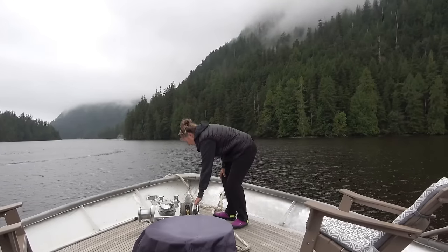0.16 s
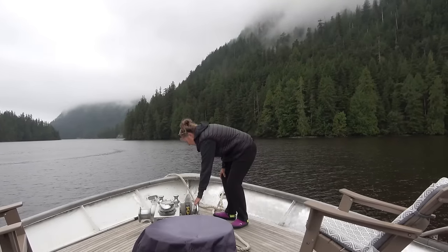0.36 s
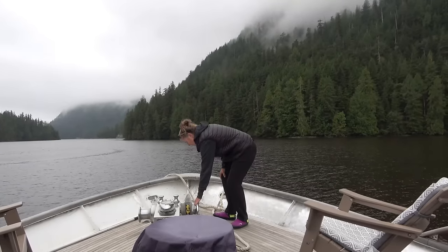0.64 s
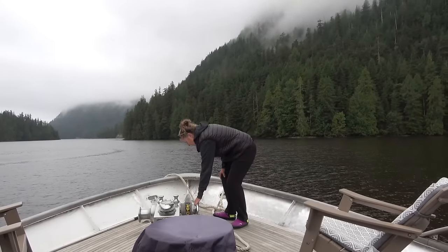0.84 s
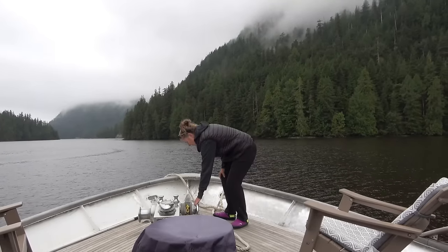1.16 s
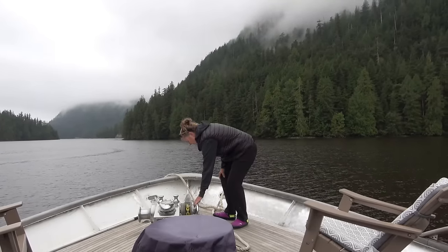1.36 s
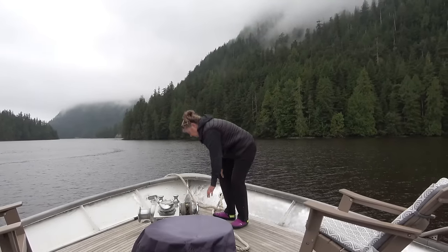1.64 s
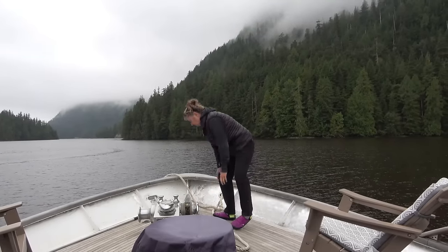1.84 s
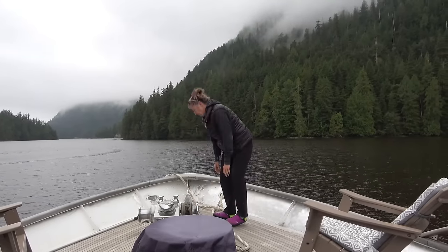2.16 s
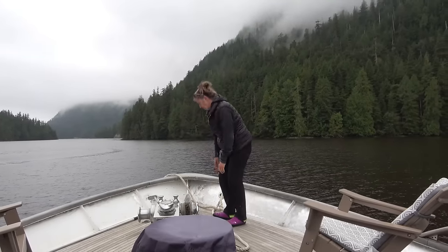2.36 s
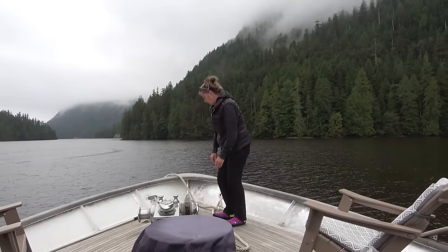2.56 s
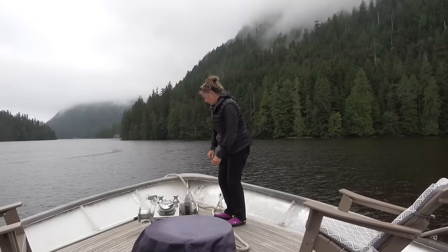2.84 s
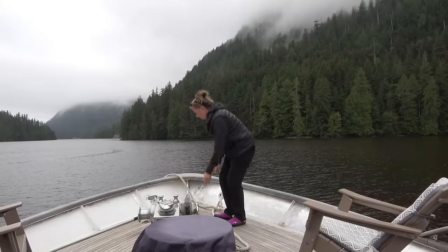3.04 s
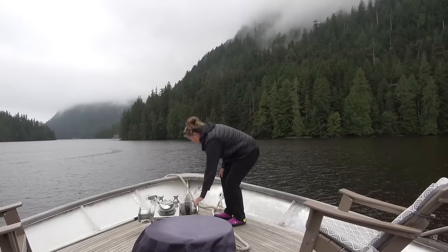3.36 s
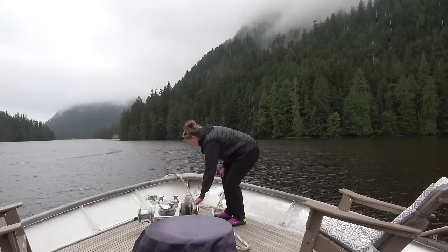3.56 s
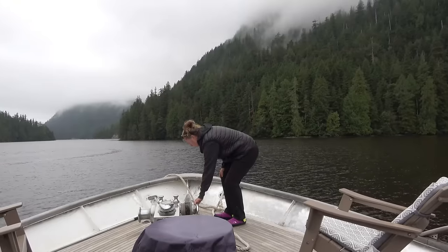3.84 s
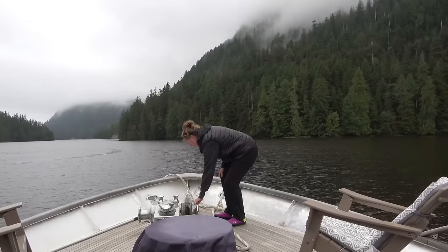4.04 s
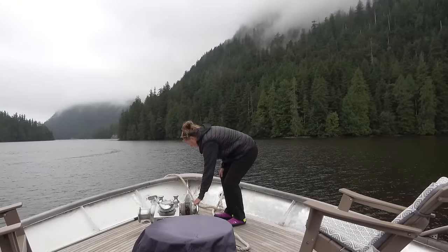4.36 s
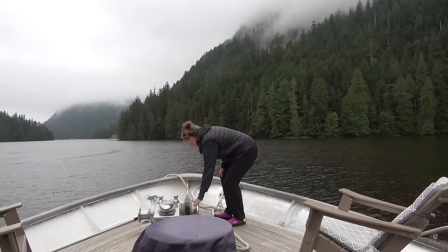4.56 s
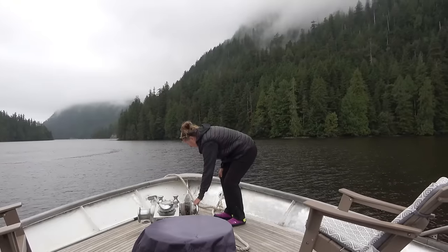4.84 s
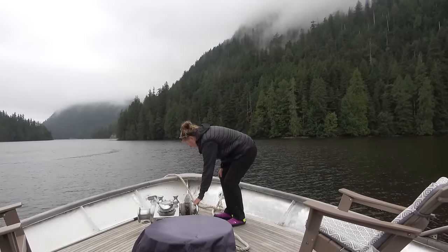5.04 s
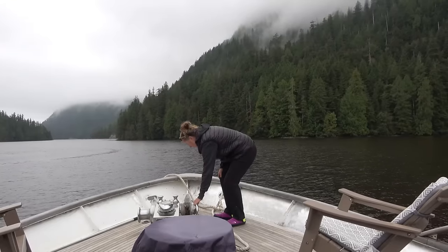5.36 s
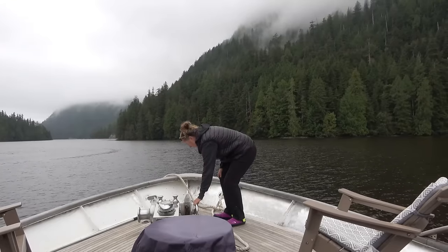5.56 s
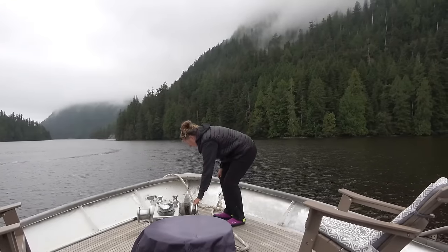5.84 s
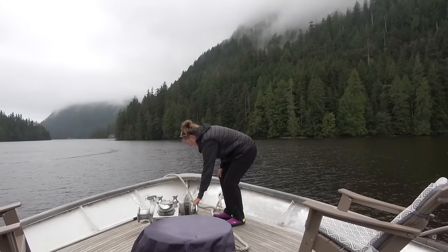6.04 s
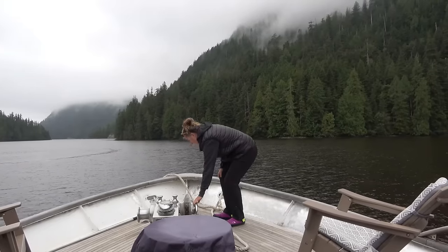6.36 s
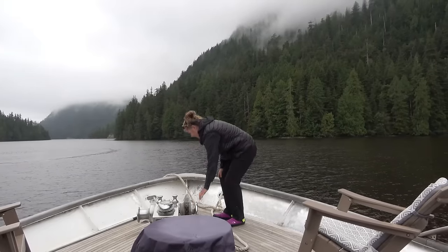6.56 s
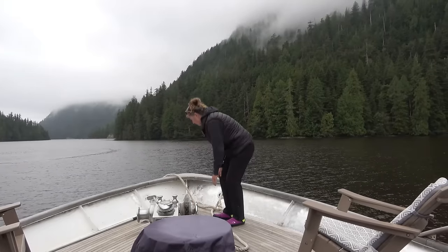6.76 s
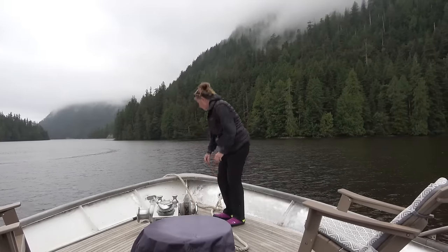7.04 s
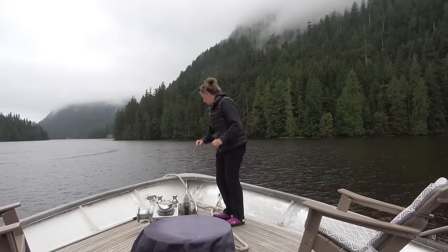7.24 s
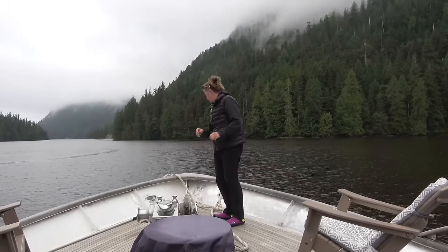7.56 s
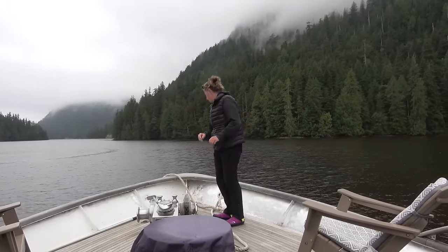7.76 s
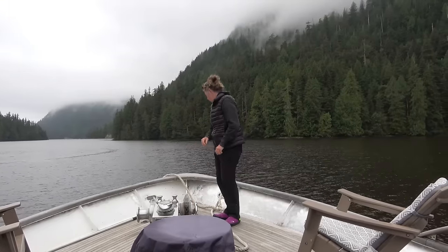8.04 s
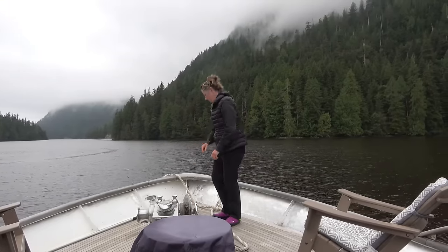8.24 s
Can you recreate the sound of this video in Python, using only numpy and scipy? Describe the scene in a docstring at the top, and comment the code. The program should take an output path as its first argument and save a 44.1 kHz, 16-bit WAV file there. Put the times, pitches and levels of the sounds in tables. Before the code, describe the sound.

Outdoors on a boat's foredeck, low diesels throb steadily throughout, their hum beating about five times a second, with a faint pump and soft wash of exhaust, water and air. From 0 to 0.7 s, anchor chain clanks loosely over windlass and roller, hardest near 0.4, then nearly stops. Around 1.1 s it starts again, with uneven steel blows, a deep swell near 1.75, and bright bell-like clinks from 2 s. By 2.7-3.9 s it is a dense, loud rattle drumming on the hollow deck, cut off near 4 s with small dying knocks. From 4.8 to 6 s a sparser third burst gives separate hard clanks and a few ringing clinks, then faint ticks until 6.7. Engines remain alone; a very faint jacket swish comes at 7.75, a deep swell at 8.1, and a dull gust rises on the microphone at the end. Close, dry, centred.

```python
"""In a calm bay, on the foredeck of an idling boat, an anchor chain runs out over the bow in three bursts.
Links clank on windlass and bow roller: bursts of noise ring through coloured bodies, with short sine notes.
Loose links clink with bell-like modes; the chain drags and rattles as streams of random knocks.
Behind lie the throbbing orders of two diesels, a pump, a wash of exhaust, water and air, two deep swells,
one jacket swish and a dull gust that gets up on the microphone near the end."""
import sys
import numpy as np
from scipy import signal
from scipy.fft import rfft, irfft, next_fast_len
from scipy.io import wavfile
from scipy.ndimage import uniform_filter1d

SR = 44100
rng = np.random.default_rng(int(sys.argv[2]) if len(sys.argv) > 2 else 0)


def log_audio(samples):
    """Write samples as a 16-bit WAV file to the path given in sys.argv[1]."""
    # one column per channel
    frames = np.atleast_2d(samples).T
    # limit to full scale, then quantise
    limited = np.clip(frames, -1, 1)
    pcm = np.round(limited * 32767).astype(np.int16)
    wavfile.write(sys.argv[1], SR, pcm)


N = 369999
TAPS = 8192  # length of a body's response and of one clank, in samples
T = np.arange(N) / SR
HZ = np.fft.rfftfreq(TAPS, 1 / SR)

# links striking windlass and bow roller: start_s, blow_db, then relative to the blow clang_db (high),
# edge_db (hard), boom_db (deck), song_db (windlass); pitch_hz of the link's own note
CLANKS = [(0.004, -41.5, -9, -50, -4, -12, 1490), (0.073, -36, -11, -46, -16, -13, 1250),
          (0.089, -40.5, -16, -44, -9, -4, 1230), (0.155, -39, -17, -42, -4, -21, 2660),
          (0.169, -37.5, -5, -35, -7, -22, 1900), (0.267, -36, -6.5, -29, -11, -6, 2270),
          (0.304, -36.5, -5.5, -23, -4, -6, 1846), (0.322, -35, -8.5, -38, -5.5, -15, 1860),
          (0.389, -21.5, -3, -24.5, -5, -8, 4250), (0.459, -52, -20, -17, 10, -5, 1350),
          (0.4895, -34, -4.5, -38, -7, -22, 2220), (0.535, -43.5, -7.5, -46, -4, -5, 2260),
          (0.575, -59, -20, -35, 7, -4, 1200), (0.61, -51, -19, -40, 1, 7, 1180),
          (0.689, -36, -6, -37, -8, -4, 1200), (0.838, -56, -15, -38, 4, 3, 1200),
          (0.871, -62.5, -20, -33, 16, -16, 1280), (1.044, -45, -8, -27, -18, -23, 2340),
          (1.123, -48.5, -3, -17, 5, 7, 3550), (1.229, -40, -3, -17, 8, 4, 2220),
          (1.247, -27, -4.5, -43, -13, -6.5, 2270), (1.278, -42, -12, -21, 0, -13, 2360),
          (1.293, -32.5, -10, -36, -6, -1.5, 2340), (1.32, -33, -6.5, -20.5, -11, -2, 1220),
          (1.341, -37.5, -9, -48, -13, 2, 2160), (1.358, -60, -14, -35, 2, 1, 1240),
          (1.398, -40.5, -3, -14, 7, 7, 2230), (1.426, -30.5, -1.5, -34, -9, -7, 2160),
          (1.493, -42, 4, -9, 9.5, 12, 2720), (1.543, -36.5, -7.5, -38, -6.5, 2.5, 1260),
          (1.579, -35, -3, -15.5, 0, 7, 4520), (1.629, -25.5, 1, -25.5, -3.5, -2, 1770),
          (1.665, -36, -6.5, -23.5, -15, -22, 2030), (1.69, -42, 1, -16.5, 1, -2, 2670),
          (1.723, -20.5, 0, -11.5, -7.5, -9, 2620), (1.739, -38.5, -1.5, -21.5, -13, -13, 2200),
          (1.75, -39.5, -5, -30, -6, -15, 1240), (1.777, -34, -4.5, -19, 1.5, 5, 1990),
          (1.811, -43, -4, -42, -8, -18, 1950), (1.838, -30.5, -11, -22, 1, -2, 4270),
          (1.857, -23, -2.5, -21, -3.5, -26, 4280), (2.003, -34, -14.5, -30.5, -8, 7, 1400),
          (2.018, -32, -9, -24, 1.5, -7, 1740), (2.034, -46.5, 5, -21, 9.5, 13.5, 2180),
          (2.086, -37, 0.5, -12.5, 0, 7.5, 2340), (2.147, -21, 0.5, -18.5, -5, -19, 2610),
          (2.167, -40, -14, -32.5, 6, -5, 1410), (2.206, -35, -2.5, -13, 4, 6, 2290),
          (2.239, -33.5, -8.5, -19, -1.5, -16, 2610), (2.259, -24.5, 3, -17.5, -7.5, -24, 2700),
          (2.283, -32.5, -21.5, -42, -6.5, -11, 1890), (2.31, -44.5, 8, -12.5, 0, 9, 3670),
          (2.349, -32.5, -10, -20, -8, -3, 4100), (2.3695, -21.5, 1, -11.5, -6, -9, 4100),
          (2.391, -31, -1.5, -23, 0, -16, 2000), (2.422, -47, 3, -3, 10, 6, 3700),
          (2.457, -45.5, 9, -21, 2.5, -12, 4090), (2.48, -28.5, 2.5, -10.5, -0.5, -1.5, 2280),
          (2.523, -29, -2, -20.5, -4, -14, 2260), (2.559, -48, 8, -36, -9, -20, 2680),
          (2.59, -45.5, 12.5, -5, -7.5, -18, 2700), (2.61, -35, -4, -10.5, -8.5, 4, 2190),
          (2.625, -33, -9, -32.5, 3, -6, 2750), (2.648, -36, 11.5, -8.5, -3, 11.5, 2730),
          (2.718, -22, 1.5, -6.5, -5, -6.5, 4060), (2.787, -42, 7.5, -4, -13, -6, 2700),
          (2.803, -35.5, 0, -14, 5.5, -3, 2260), (2.815, -29.5, 2, -8, 7.5, 7.5, 2580),
          (2.831, -36.5, -1.5, -29, -3, -10, 1780), (2.86, -32.5, -1.5, -14, -5, 2, 3560),
          (2.879, -29, -9.5, -46, 3, -15, 2360), (2.894, -32, 5, -27, -30.5, -14, 2800),
          (2.911, -23.5, 3, -14, -11, -13, 2670), (2.953, -31, 1, -11, 7, 7, 2540),
          (2.994, -36, -3, -12, -1.5, 8, 5180), (3.02, -26, 3, -9, -27, -21, 4230),
          (3.039, -31, -2, -15.5, 5.5, 2, 4550), (3.077, -29, -1.5, -18.5, -4, 2.5, 2310),
          (3.119, -38, 5.5, -6, 12.5, 11, 4490), (3.135, -24, -3.5, -19, -18, -19, 4320),
          (3.176, -28.5, -12, -44, -2, -9, 1820), (3.198, -32.5, -0.5, -18, -5.5, 5, 2240),
          (3.208, -24, -3, -18, -5.5, -5, 4520), (3.246, -34, -3.5, -16, 1.5, 6.5, 1360),
          (3.282, -25, -1, -19, -4.5, -3, 2610), (3.298, -32, -6, -26, -7.5, -12, 1400),
          (3.326, -25, -2.5, -22, -4, -1, 2700), (3.358, -28.5, -3, -17.5, 1.5, 4.5, 3660),
          (3.373, -29.5, 0.5, -14, -10, -19.5, 3600), (3.397, -26.5, -1.5, -19, 2.5, 4, 4290),
          (3.443, -28.5, 0, -20, -5, 4.5, 3800), (3.488, -23, -2, -18.5, -21, -8, 4240),
          (3.514, -24, -2.5, -23, -4, -5, 2690), (3.536, -34.5, -1.5, -14.5, -13.5, -14, 2250),
          (3.55, -29.5, 0, -15, 3, 8.5, 2670), (3.579, -28.5, -2.5, -12, 2.5, -25, 1940),
          (3.597, -25, -1, -22, -10.5, 1, 1880), (3.611, -37, -5.5, -18, 3.5, -3, 1220),
          (3.623, -25, -2.5, -18, -5, -8, 2800), (3.645, -40, 0, -25, -10, -5, 2020),
          (3.664, -32.5, 4, -12, -13, 8, 2750), (3.681, -34.5, 1, -20, -4, -6, 1380),
          (3.708, -31, 2, -12, 4.5, 8.5, 2680), (3.727, -28.5, -1.5, -19, -15, 4.5, 3700),
          (3.748, -26.5, 0.5, -14.5, -12, 1, 2600), (3.766, -28.5, -3.5, -22, 1, -12, 2660),
          (3.788, -36, -3, -29, 5, -1, 2900), (3.8, -38.5, 4, -22, -10, 7, 2240),
          (3.812, -33.5, 6.5, -12, -23, -5, 4540), (3.848, -36, 1.5, -22.5, 0, 1, 2570),
          (3.876, -34, -10, -29.5, -13, -5, 1650), (3.904, -31, -3.5, -24, -10, -7, 2000),
          (3.926, -27, 4, -25, -38, -19, 2760), (3.955, -27, -6, -32.5, -24, -8, 1180),
          (3.996, -43.5, -19, -38, -11, -2, 1200), (4.027, -43, -11, -45, -19, -13, 1415),
          (4.105, -54, -16, -40, -6, -10, 1380), (4.122, -53, -21, -38, -15, -4, 1200),
          (4.24, -60, -19, -39, -3.5, -2, 2080), (4.3, -59, -20, -38, -2, -1, 1410),
          (4.34, -62, -14.5, -38, -6, -6, 1610), (4.465, -48, -20, -44, -13, -14, 1670),
          (4.613, -47.5, -19, -38.5, -14, -12, 1150), (4.835, -44.5, -2, -27, 0.5, 5.5, 2530),
          (4.856, -32, -6, -37, -8, -20, 2630), (4.87, -53, -15, -38, 10, -12, 2680),
          (4.9495, -20.5, -2.5, -15, -12.5, -26, 1760), (4.966, -39, -9, -47, -6, -15, 1400),
          (4.988, -35, -6, -45, -13, -15.5, 1150), (5.018, -49, 0.5, -20, 13, 8, 2750),
          (5.0705, -22, -4, -20, -15.5, -28, 2710), (5.126, -36.5, -2, -22, -11, -3.5, 2610),
          (5.188, -27, 2, -14.5, -7.5, -17, 4090), (5.228, -36, -17, -43, -5, -5, 1140),
          (5.245, -47.5, 2, -19, 2, 0, 2630), (5.291, -28, -1.5, -26, -8, -7, 2310),
          (5.331, -33.5, -8, -33, -26, -15, 2560), (5.348, -37.5, -2, -35, -8, -11, 2650),
          (5.41, -24.5, -1.5, -21, -24, -36, 4670), (5.434, -37.5, -13, -42, -14, -20, 1200),
          (5.494, -32.5, -3.5, -34, -5, -6, 3610), (5.536, -51, -3, -30, -4, 2, 1400),
          (5.556, -40, -13, -38, -14, -8, 1820), (5.606, -28.5, -5, -29, -16, -15, 1840),
          (5.724, -45.5, -1.5, -20, 4, 3, 2600), (5.744, -36.5, -8, -36, 1, -16, 2660),
          (5.79, -48, -2, -23, 0, -5, 3640), (5.822, -26, -3.5, -29, -11, -9, 2715),
          (5.92, -38.5, -10, -24, 0, -3, 2220), (5.937, -30.5, -3, -31, -12, -17, 4430),
          (5.962, -47, -8, -34, -4, -20, 2010), (5.991, -31, -6, -29, -8.5, -15, 3670),
          (6.025, -35, -9.5, -45, -26, -14, 2610), (6.099, -61, -19, -40, 21, -1, 1240),
          (6.184, -45.5, -22, -42, -13, -15, 1146), (6.238, -62.5, -18, -38.5, 0, 5, 1410),
          (6.263, -60, -17, -36, 0, 3.5, 1200), (6.43, -62.5, -16.5, -35.5, 9, -6, 1150),
          (6.739, -61, -21, -31, 4.5, -7.5, 1220)]
# overall colour of roller and windlass: frequency_hz, relative level_db
STEEL = [(400, 16.5), (900, -6), (1600, -6.5), (3200, -11.5), (4500, -16), (5400, -21), (6300, -24.5),
         (7600, -32), (8800, -31), (11000, -43), (14000, -53), (15500, -40.5)]
# resonances of roller and windlass: frequency_hz, width_hz, lift_db
STEEL_MODES = [(804, 98, 7.3), (892, 110, 3.6), (1040, 120, 7.2), (950, 35, 3), (1135, 40, -2.5),
               (1220, 146, 7.6), (1383, 48, 7.7), (1469, 43, 5.7), (1600, 80, 3), (1715, 90, 6),
               (1883, 100, 6.6), (2015, 50, 3), (2198, 263, 7.1), (2287, 41, 3.6), (2389, 43, 2.7),
               (2685, 226, 8.3), (2876, 52, 4.2), (2980, 120, -3), (3240, 110, 4.5), (3624, 93, 5.0),
               (3832, 161, 2.4), (4138, 412, 7.3), (4312, 78, 5.0), (4532, 100, 8.8), (4930, 220, 3),
               (5235, 220, 8), (5490, 160, 4), (5910, 110, 3), (6650, 70, 4), (9600, 200, 3),
               (10850, 110, 4), (12100, 110, 6)]
# overall colour of the foredeck: frequency_hz, relative level_db
DECK = [(40, -22), (75, -9.5), (110, -0.5), (170, 1), (215, 0.5), (300, -4), (400, -3), (700, -15.5),
        (1100, -17.5), (1800, -27), (5000, -70.5)]
# resonances of the windlass on the deck: frequency_hz, width_hz, lift_db
DECK_MODES = [(239.6, 13, 9), (293.3, 7.7, 8), (480.4, 16, -4.5), (523, 30, 4.5), (567, 9.7, 7),
              (636.2, 47, 13), (679, 57, 8), (787, 48, 11), (830, 20, 11.5), (860, 24, 5.5), (1094, 34, 1)]
# colour of link ticking on link: frequency_hz, relative level_db
TICK = [(500, -7.5), (2500, 2.5), (5000, 11), (9000, 12), (13500, 0), (14900, 3.5), (15600, -2)]
# colour of the deepest rumble: frequency_hz, relative level_db
RUMBLE = [(10, -22.5), (20, -13.5), (27, 2), (36, -4.5), (55, -8), (90, -22.5), (200, -51.5), (600, -91)]
FULL_RUN_DB = -33.5  # drag of a free run


def amp(db):
    """Decibels to gain."""
    return 10 ** (np.asarray(db) / 20)


def unit(x):
    """Scales to rms 1."""
    return x / np.sqrt(np.mean(x ** 2) + 1e-20)


def curve(rows):
    """Joins (s, value) rows by straight lines."""
    return np.interp(T, *np.transpose(rows))


def add(mix, s, sound):
    """Mixes a sound in at time s."""
    start = round(s * SR)
    part, sound = mix[max(start, 0):], sound[max(-start, 0):]
    part[:len(sound)] += sound[:len(part)]


def colour(points, modes=()):
    """Gain over frequency: a smooth slope with resonances shaping it."""
    hz, db = np.transpose(points)
    slope = np.interp(np.log(HZ + 1), np.log(hz), db)
    peaks = sum(lift / (1 + (2 * (HZ - f) / width) ** 2) for f, width, lift in modes)
    return amp(slope + peaks)


def below(hz):
    """Gain of a smooth crossover low-pass."""
    return 1 / np.sqrt(1 + (HZ / hz) ** 8)


def ring(x, gain):
    """Passes x through a causal (minimum-phase) body of that gain, keeping the power of white noise."""
    cepstrum = irfft(np.log(np.maximum(gain / gain.max(), 1e-5)))
    # folding the cepstrum forward in time makes the response causal
    cepstrum[1:TAPS // 2] *= 2
    cepstrum[TAPS // 2 + 1:] = 0
    response = irfft(np.exp(rfft(cepstrum)))
    return signal.oaconvolve(x, response / np.linalg.norm(response))[:N]


def wander(rate_hz):
    """Random drift of rms 1: noise that fades out above about rate_hz."""
    size = next_fast_len(N, real=True)
    f = np.fft.rfftfreq(size, 1 / SR)
    spectrum = rfft(rng.standard_normal(size)) * np.exp(-(f / rate_hz) ** 2)
    return unit(irfft(spectrum, size)[:N])


def grit(spread_db):
    """Dense micro-impacts of uneven size."""
    return unit(rng.standard_normal(N) * amp(spread_db * wander(1400)))


def clanks(chatter_db=2):
    """Each link scrapes on, cracks on the steel and chatters briefly; deck, windlass and roller ring."""
    # how boom, song, blow, clang and edge swell and die: head_start_s, rise_s, decay_s,
    # late_tail_db, level_db, micro_impact_unevenness_db, crack_db
    registers = [(.002, 0.003, .011, -6, -0.5, 1.5, -7.5), (.002, 0.0032, .014, -17.5, -3, -0.5, -4.5),
                 (0.002, 0.0055, 0.012, -8.5, -3.14, .5, -6.5),
                 (0.00067, .0047, 0.0074, -20.5, 1.3, 2.5, -8.5), (0.0014, 0.0043, 0.007, -15, 7, 2, -5.5)]
    lead = .03  # s of each excerpt that lie ahead of the strike
    ripple_db = 2.2
    scrape_s, scrape_db = 0.0069, -15.5  # a link scrapes on before it seats itself
    tail_s = 0.023  # the roller rings on after
    # shares of the five registers, low to high, split the power at four crossovers
    crossovers = [below(hz) ** 4 for hz in (620, 800, 2900, 6500)]
    shares = np.sqrt(np.diff([0 * HZ] + crossovers + [1 + 0 * HZ], axis=0).clip(0))
    deck, steel = colour(DECK, DECK_MODES), colour(STEEL, STEEL_MODES)
    bodies = (deck, deck, steel, steel, steel)
    times, blow, clang, edge, boom, song, _ = np.transpose(CLANKS)
    levels = (blow + boom, blow + song, blow, blow + clang, blow + edge)
    spans = np.round((times[:, None] - lead) * SR).astype(int) + np.arange(TAPS)
    chatter, out = amp(chatter_db * wander(520)), np.zeros(N)
    # every link lands on another spot and favours other resonances
    spot = rng.standard_normal((len(CLANKS), len(HZ)))
    spot = uniform_filter1d(uniform_filter1d(spot, size=60), size=60)
    spot = amp(ripple_db * np.tanh(unit(spot)))
    for register, level, body, share in zip(registers, levels, bodies, shares):
        early_s, rise_s, decay_s, tail_db, trim_db, grit_db, crack_db = register
        t = np.arange(TAPS) / SR - lead + early_s
        before, after = np.maximum(-t, 0), np.maximum(t, 0)
        scrape = amp(scrape_db) * np.exp(-before / scrape_s)
        attack = np.hypot(np.exp(-(before / rise_s) ** 2), scrape)
        decay = np.hypot(np.exp(-after / decay_s), amp(tail_db) * np.exp(-after / tail_s))
        shape = attack * decay
        weight, gain = np.linalg.norm(shape), body * share
        # the crack is a single impulse at the strike
        crack = amp(crack_db) * weight * np.exp(-2j * np.pi * HZ * lead)
        noise = unit(chatter * grit(grit_db))[spans]
        force = spot * (crack + rfft(shape * noise))
        # every blow brings its body the same energy before its level is set
        force *= weight * np.linalg.norm(gain) / np.linalg.norm(force * gain, axis=1, keepdims=True)
        drive = np.zeros(N)
        for s, db, blow_force in zip(times, level, irfft(force)):
            add(drive, s - lead, amp(db + trim_db) * blow_force)
        out += ring(drive, gain)
    return out


def link_notes(note_db=-6.5, rise_s=.0008, decay_s=.0085, spread=.022, count=3):
    """A loaded link adds a short note of its own: a cluster of close modes around its pitch."""
    t, out = np.arange(SR // 10) / SR, np.zeros(N)
    shape = (1 - np.exp(-t / rise_s)) * np.exp(-t / decay_s)
    draws = rng.standard_normal((len(CLANKS), 2, count, 1))
    for (s, db, *_, hz), (detune, turn) in zip(CLANKS, draws):
        phase = 2 * np.pi * (hz * (1 + spread * detune) * t + turn)
        modes = np.sin(phase).sum(0) * np.sqrt(2 / count)
        add(out, s - rise_s, amp(db + note_db) * shape * modes)
    return out


def windlass_song(song_hz=642, spread=0.027, song_db=-5, rise_s=0.00496, decay_s=0.017):
    """Each jerk of the chain sets the windlass singing briefly, at a slightly different random pitch."""
    t, out = np.arange(SR // 5) / SR, np.zeros(N)
    shape = (1 - np.exp(-(t / rise_s) ** 2)) * np.exp(-(t - rise_s) / decay_s)
    draws = rng.standard_normal((len(CLANKS), 2))
    for (s, db, *_, relative_db, _), (detune, turn) in zip(CLANKS, draws):
        tone = np.sqrt(2) * np.sin(2 * np.pi * (song_hz * (1 + spread * detune) * t + turn))
        add(out, s - rise_s, amp(db + relative_db + song_db) * shape * tone)
    return out


def clinks(tick_db=0, tick_s=0.000584, after_db=-17, after_s=0.0083):
    """A sharp tick, then the bell-like modes of a link; no two links are quite alike."""
    # loose links that clink out clearly: start_s, level_db, ring_db (how freely it rings, against level_db)
    loose_links = [(0.294, -38, -0.5), (1.193, -55, 10.5), (1.227, -45, -12), (1.4164, -49.5, 0.5),
                   (1.5848, -33.5, 1), (1.939, -52.5, 18), (2.1293, -47.5, 0), (2.2374, -42, -2.5),
                   (2.2917, -42, 8.5), (2.3466, -44, 0), (2.3984, -41, 13.5), (2.4331, -37, 6.5),
                   (2.57, -44.5, -4), (2.598, -32, -8), (2.706, -30.5, -1.5), (2.7869, -34, 0.5),
                   (2.81, -27, -1.5), (2.887, -38.5, 9), (2.911, -29, -3), (4.8325, -52.5, 5),
                   (4.87, -64, 7), (5.7225, -48.5, 11), (5.742, -46, 9), (5.7535, -50, 16),
                   (5.7783, -53, 8), (5.83, -65, 3), (5.88, -62, 13.5), (5.9, -44, 4)]
    # modes of one free link: frequency_hz, relative level_db, t60_s
    link_modes = [(2540, 2, 0.064), (3640, -6.5, 0.5), (4740, -13.5, 0.34), (6050, -17.5, 0.35),
                  (6300, -18.5, 0.14), (7100, -17, 0.17), (8880, -25, 0.32), (9100, -20, 0.14),
                  (12200, -33.5, .2), (15500, -40.5, .1)]
    ring_db, detune, uneven_db = -6, .002, 1
    t = np.arange(SR // 3) / SR
    hz, db, t60 = np.transpose(link_modes)[:, :, None]
    fade = np.exp(-np.log(1000) * t / t60)
    tick = np.exp(-t / tick_s) + amp(after_db) * np.exp(-t / after_s)
    ticks, bells = np.zeros((2, N))
    for s, level_db, free_db in loose_links + stray_clinks():
        pitch, size, turn = rng.standard_normal((3, len(link_modes), 1))
        tones = np.sin(2 * np.pi * (hz * (1 + detune * pitch) * t + turn))
        modes = amp(db + uneven_db * size) * fade * tones
        add(bells, s, amp(level_db + free_db) * modes.sum(0))
        add(ticks, s, amp(level_db) * tick)
    # neighbouring links keep brushing the ringing one and roughen its tone
    touching = .85 + speed_at(T) ** 2 * (.45 * wander(60) + .35 * wander(350))
    return amp(tick_db) * ring(ticks * grit(1.2), colour(TICK)) + amp(ring_db) * touching * bells


def stray_clinks(count=200):
    """Links touch by chance, more often and harder the faster the chain runs: start_s, level_db, ring_db."""
    per_s, level_db, spread_db, ring_db = 17, -36.5, 5.5, -4.5  # rate and level at speed 1
    place, chance, size = rng.random((count, 3)).T
    times = (np.arange(count) + place) / count * T[-1]
    speed = speed_at(times)
    levels = level_db + spread_db * (2 * size - 1) + 20 * np.log10(speed ** 2)
    touch = chance < per_s * speed ** 4 * T[-1] / count
    return [(s, db, ring_db) for s, db in zip(times[touch], levels[touch])]


def drag_at(s):
    """Drag of the chain in dB, relative to a free run."""
    # how hard the chain runs in its three bursts: time_s, drag_db on the deck
    bursts = [(0, -45.5), (.38, -49.5), (.62, -66), (.85, -63), (1.12, -47), (1.235, -39.5), (1.8, -39),
              (1.92, -36.5), (2.03, -39.5), (2.11, -38.5), (2.2, -37), (2.6, -35.5), (2.68, -34.5),
              (2.85, -32), (3.25, -35.5), (3.7, -31), (3.85, -37.5), (3.95, -33), (4.0, -43), (4.07, -64.5),
              (4.4, -74), (4.66, -54), (4.8, -43), (5.0, -42.5), (5.45, -41.5), (5.65, -47), (5.74, -40),
              (6.0, -46), (6.15, -50.5), (6.4, -70)]
    return np.interp(s, *np.transpose(bursts)) - FULL_RUN_DB


def speed_at(s):
    """Near 0 when the chain creeps, towards 1 when it runs free."""
    fast_db = -40  # drag above which links fly loose
    return 1 / np.hypot(1, amp(fast_db - FULL_RUN_DB - drag_at(s)))


def knocks(per_s, decay_s, spread_db, bed):
    """A random stream of short bursts over a bed of scraping."""
    chance, size = rng.random(N), rng.uniform(-0.72, 1, N)
    hits = (chance < per_s / SR) * amp(spread_db * size) ** 2
    power = signal.lfilter([1], [1, -np.exp(-2 / (decay_s * SR))], hits)
    return unit(np.sqrt(power / power.mean() + abs(bed)) * grit(2.3))


def running_chain(drag_db=-3.5, sing_db=-5, fizz_db=-21):
    """The chain drums on the foredeck; small knocks rattle the steel, and at speed the windlass sings."""
    # thin ring of links racing over the roller: frequency_hz, width_hz, lift_db
    shimmer = [(9200, 120, 6), (12000, 130, 10), (15400, 500, 7)]
    rattle_db, rattle_per_drag = -39, 1.8  # level at full run; dB per dB of drag
    heave_db, heave_per_drag = -39.5, 0.64  # the hull heaves under the chain's weight, by the same law
    run_db, speed = drag_at(T), speed_at(T)
    drag = amp(FULL_RUN_DB + run_db)
    rattle = amp(rattle_db + rattle_per_drag * run_db)
    heave = amp(heave_db + heave_per_drag * run_db)
    body, low = colour(DECK, DECK_MODES), below(430)
    deck = ring(knocks(240, 0.009, 4.5, 0.27), body * low)
    windlass = ring(knocks(140, 0.014, 2.3, 0.079), body * np.sqrt(1 - low ** 2))
    # soft knocks are duller than full blows
    light_touch = np.sqrt(1 - below(960) ** 2) * below(7600) / np.hypot(1, HZ / 4000)
    steel = ring(knocks(170, 0.0063, 6.1, 0.061), colour(STEEL, STEEL_MODES) * light_touch)
    # fast links tick on each other
    bright = colour(TICK, shimmer) * np.sqrt(1 - below(5500) ** 2)
    fizz = ring(knocks(90, 0.0094, 4.5, 0.15), bright)
    hull = unit(ring(rng.standard_normal(N), colour(RUMBLE)))
    rumble = drag * (amp(drag_db) * deck + amp(sing_db) * speed * windlass)
    return rumble + rattle * (steel + amp(fizz_db) * speed ** 2 * fizz) + heave * hull


def machine(lines, hz, fire_s, jitter_s=0.000076, flutter=0.041):
    """Orders of a turning machine that wavers a little; the two lowest peak at fire_s, the rest lag at random."""
    turns = hz * (T - fire_s + jitter_s * wander(1.2))
    lags = rng.random(len(lines))
    orders = 0
    for (k, db), lag in zip(lines, lags):
        orders = orders + amp(db) * np.cos(2 * np.pi * (k * turns + lag * (k > 2)))
    return (1 + flutter * wander(3.5)) * np.sqrt(2) * orders


def engines():
    """Two diesels and a pump; strong lines at 42.9 and 38.1 Hz beat about five times a second."""
    # lines of the main diesel: multiple of base rate, rms level_db
    main_lines = [(1, -63.5), (2, -53), (3, -53.5), (4, -59.5), (5, -77), (6, -48), (7, -59.5), (9, -60.5),
                  (11, -73), (12, -76), (14, -76.5), (17, -71), (18, -68.5), (21, -76.5), (26, -73),
                  (44, -82.5), (87, -86)]
    # lines of the generator diesel: multiple of base rate, rms level_db
    generator_lines = [(1, -44), (2, -59.5), (8, -71.5), (12, -85)]
    # lines of the pump: multiple of base rate, rms level_db
    pump_lines = [(1, -59.5), (2, -64.5), (4, -71.5), (5, -81.5), (6, -81)]
    diesels = machine(main_lines, 21.44, .020) + machine(generator_lines, 38.1, 0.02)
    return diesels + machine(pump_lines, 112.6, 0, jitter_s=0.00029, flutter=0.34)


def wash(lap_db=1.45):
    """Exhaust, water and light air as coloured noise; a dull gust gets up near the end."""
    # colour of the wash: frequency_hz, relative density_db per Hz
    wash_colour = [(4, -11), (10, 1.5), (25, 9), (50, 3), (100, -12.5), (200, -16.5), (400, -19),
                   (650, -22.5), (950, -34), (1350, -36.5), (2500, -44.5), (4800, -50), (7000, -60.5),
                   (15000, -66.5)]
    # faint resonances of the engine room: frequency_hz, width_hz, lift_db
    engine_room = [(1110, 37, 5), (1330, 60, 6.5), (1850, 130, 3), (2380, 280, 5), (2880, 40, 4)]
    # slow change of the wash: time_s, change_db
    breeze = [(0, 2.1), (4.7, 2), (6.6, -1), (8.39, 2)]
    # the gust on the microphone: time_s, level_db
    gust_level = [(7.2, -100), (7.7, -55), (8.15, -56.5), (8.39, -43)]
    wash_db = -45.5
    level = amp(wash_db + curve(breeze) + lap_db * wander(26))
    steady = level * ring(rng.standard_normal(N), colour(wash_colour, engine_room))
    gust_colour = colour([(8, 6.0), (25, 18.0), (60, -3.5), (200, -4.0), (370, 5.0), (600, -10.0),
                          (820, -9.5), (1100, -28.0), (3000, -35), (12000, -55.5)])  # Hz, dB
    return steady + amp(curve(gust_level)) * ring(grit(0.91), gust_colour)


def swells():
    """Brief swells of very deep rumble: low noise under bell-shaped envelopes."""
    # two swells: centre_s, length_s, level_db
    swell_rows = [(1.75, 0.15, -36.5), (8.119, 0.14, -38)]
    level = sum(amp(db) * np.exp(-((T - s) / length_s) ** 2) for s, length_s, db in swell_rows)
    return level * ring(rng.standard_normal(N), colour(RUMBLE))


def jacket(length_s=0.027):
    """A jacket swishes: a short stroke of gritty noise, coloured like smooth cloth."""
    # strokes of the jacket: centre_s, level_db
    strokes = [(7.76, -72)]
    # colour of the cloth: frequency_hz, relative level_db
    cloth = [(1200, -33.5), (3000, 5), (5000, 0.5), (7000, -5), (9500, 0), (13000, -18), (16000, -18)]
    stroke = sum(amp(db) * np.exp(-((T - s) / length_s) ** 2) for s, db in strokes)
    return ring(stroke * grit(2.87), colour(cloth))


def scene():
    """Everything reaches the microphone from straight ahead, dry: both channels are alike."""
    chain = clanks() + link_notes() + windlass_song() + clinks() + running_chain()
    background = engines() + wash() + swells() + jacket()
    mono = chain + background
    return np.array([mono, mono])


def record(dry):
    """The loudest peaks are rounded off softly below a ceiling; then a low-pass limits the band."""
    ceiling, edge_hz = .31, 15950
    rounded = dry / (1 + (dry / ceiling) ** 4) ** (1 / 4)
    low_pass = signal.firwin(511, edge_hz, window=("kaiser", 9), fs=SR)
    return signal.oaconvolve(rounded, low_pass[None], "same")


dry = scene()
out = record(dry)
log_audio(out)
```